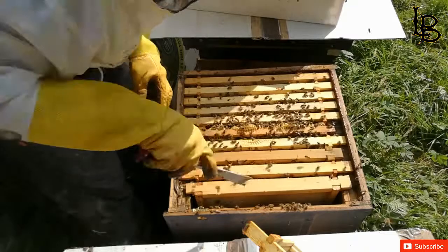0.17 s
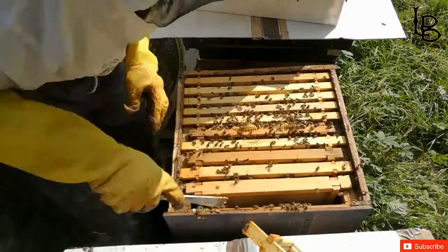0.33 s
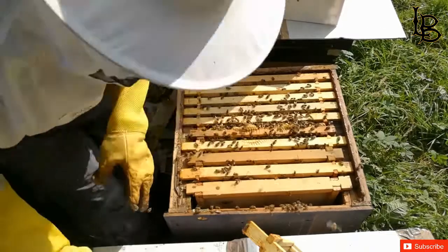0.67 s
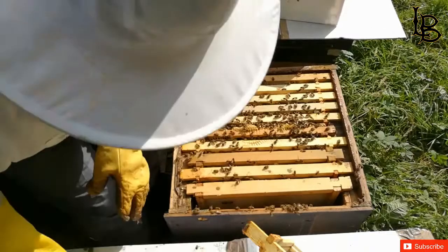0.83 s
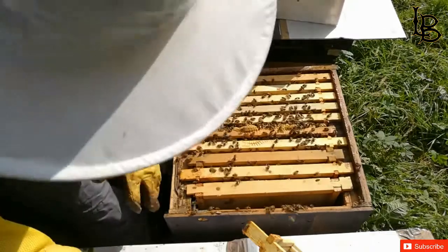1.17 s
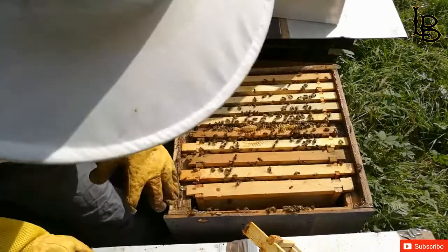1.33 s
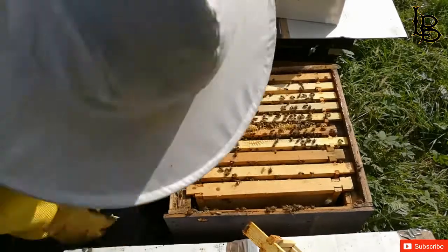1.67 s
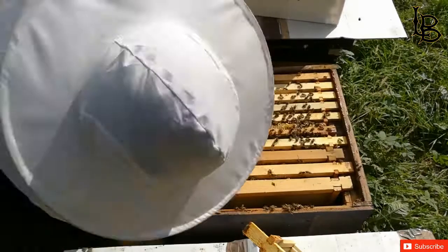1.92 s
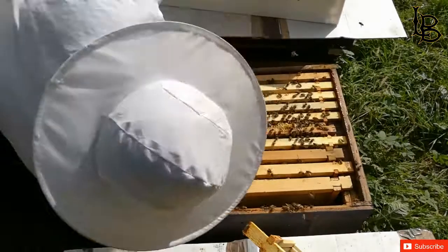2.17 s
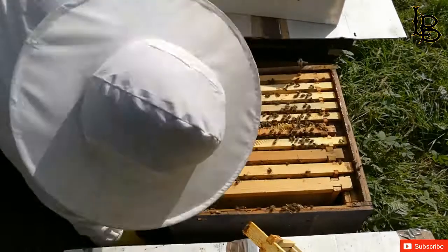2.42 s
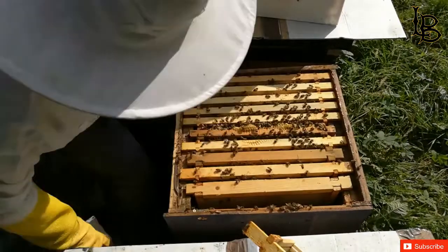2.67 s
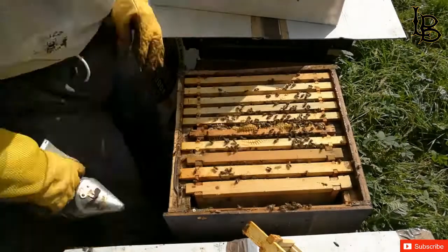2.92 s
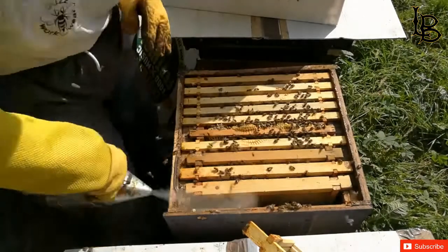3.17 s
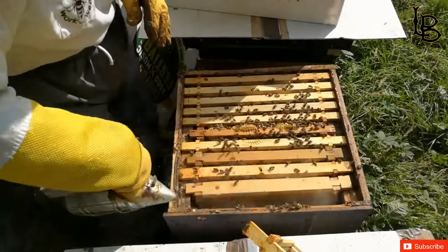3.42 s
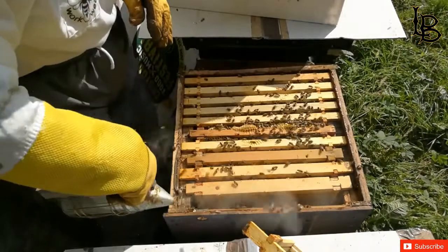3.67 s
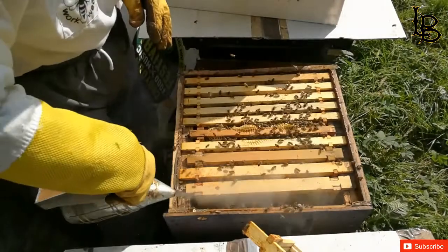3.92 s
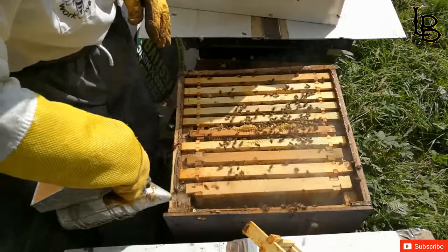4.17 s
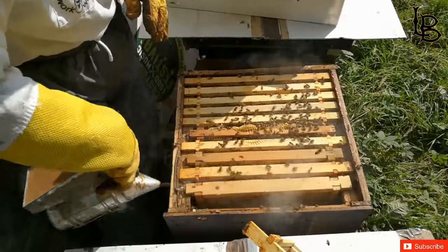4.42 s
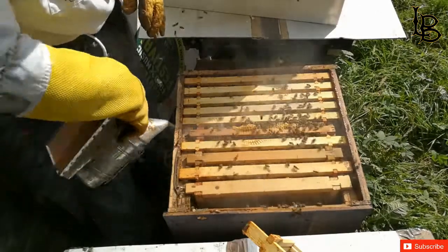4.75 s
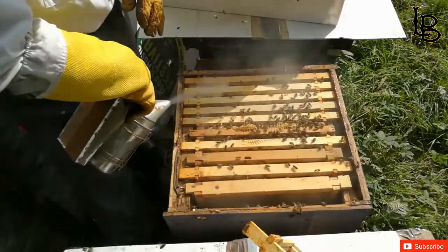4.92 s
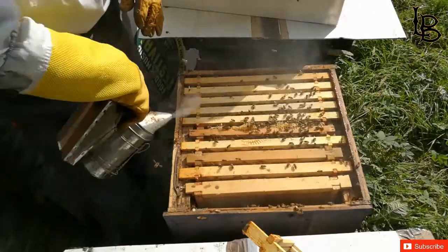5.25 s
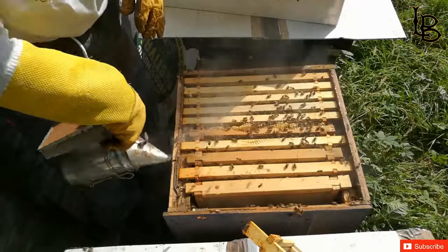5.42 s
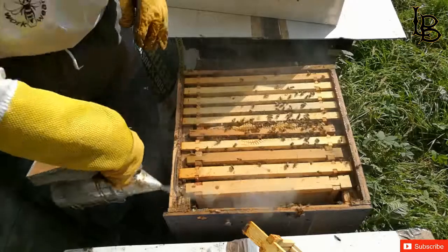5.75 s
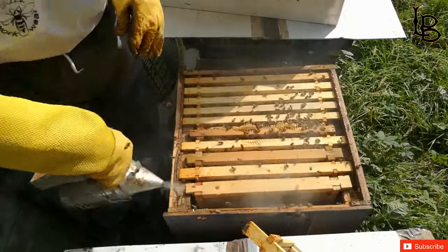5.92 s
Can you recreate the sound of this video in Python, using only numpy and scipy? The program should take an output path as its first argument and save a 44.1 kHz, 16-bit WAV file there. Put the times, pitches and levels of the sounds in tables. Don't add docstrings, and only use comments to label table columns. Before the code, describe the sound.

Outdoors by an open beehive, soft wooden knocks and a metal clatter give way to quick, hollow smoker puffs with a fine high sizzle.

```python
import sys
import numpy as np
from scipy import signal
from scipy.fft import rfft, irfft, next_fast_len
from scipy.io import wavfile
from scipy.ndimage import uniform_filter1d, map_coordinates

SR = 44100
rng = np.random.default_rng(int(sys.argv[2]) if len(sys.argv) > 2 else 0)


def amplitude_ratio(level_db):
    exponent = np.asarray(level_db, float) / 20
    return 10 ** exponent


def generate_wav(sig):
    pcm = np.round(np.clip(np.atleast_2d(sig).T, -1, 1) * 32767).astype(np.int16)
    wavfile.write(sys.argv[1], SR, pcm)


N = 268524
T = np.arange(N) / SR


def unit(x):
    return x / np.sqrt(np.mean(x ** 2) + 1e-20)


def along(points, hz):
    f, *cols = np.transpose(points)
    return [np.interp(np.log(hz + 1), np.log(f + 1), c) for c in cols]


def coloured(points):
    return lambda f: amplitude_ratio(along(points, f)[0])


def curves(rows):
    s, *cols = np.transpose(rows)
    return [np.interp(T, s, c) for c in cols]


def wobble(rate):
    knots = rng.standard_normal(int(N * rate / SR) + 4)
    return map_coordinates(knots, [T * rate])


def filtered(x, response):
    m = next_fast_len(N + 8192)
    return irfft(rfft(x, m) * response(np.fft.rfftfreq(m, 1 / SR)), m)[..., :N]


def resonant(peaks):
    def response(f):
        total = 0
        for k, (centre, width, db) in enumerate(peaks):
            peak = 1j * f * width / (centre * centre - f * f + 1j * f * width)
            total = total + (-1) ** k * amplitude_ratio(db) * peak
        return total
    return response


def noise(response, lumpy_db, rate):
    lumps = amplitude_ratio(lumpy_db * wobble(rate))
    return unit(filtered(lumps * rng.standard_normal((2, N)), response))


def add(out, s, x):
    part = out[..., round(s * SR):][..., :x.shape[-1]]
    part += x[..., :part.shape[-1]]


# frequency in Hz, lead of the left port in radians, left over right in dB, likeness (0 to 1).
LEFT_OF_CAMERA = [(60, 0.1, 2, 1), (135, 0.23, -1.5, 0.96), (238, 0.66, 0.5, 0.97), (373, 1.18, 0, 0.97),
                  (527, 1.38, 8, 0.58), (720, 2.62, 9, 0.53), (990, 2.07, 8, 0.87), (1270, 0.88, 0, .8),
                  (1385, .5, 4, 0.85), (1540, 1.2, -5, 1), (1820, 0.88, -4, 0.45), (2000, 1.9, -8.5, 0.4),
                  (2250, 3.3, -1, 0.29), (3070, 6.1, 2.5, 0.12), (8000, 4.7, 4, 0.072)]
# frequency in Hz, lead of the left port in radians, left over right in dB, likeness (0 to 1).
ALL_AROUND = [(115, -3.5, -1, 1), (200, 0.5, 0, 1), (310, 0, -2, 0.81), (478, 0.85, 3, 0.81),
              (634, 3.5, -1, 0.45), (1030, 0, 1.5, 0.45), (1380, 0, 1, 0.5), (1940, 0.5, 0, 0.093),
              (7300, -0.5, 2, 0.014), (10740, -4, 9, .02), (12460, 4, 2, .02), (15300, -0.5, -11, .02)]


def ports(a, b, table):
    m = next_fast_len(N + 8192)
    lead, pan_db, alike = along(table, np.fft.rfftfreq(m, 1 / SR))
    turn = np.arccos(np.clip(alike, -1, 1)) / 2
    mid, side = rfft(a, m) * np.cos(turn), rfft(b, m) * np.sin(turn)
    half = amplitude_ratio(pan_db / 2) * np.exp(.5j * lead)
    return irfft([(mid + side) * half, (mid - side) / half], m)[:, :N]


def ring(pitches, modes, low_db, high_db, scatter_db, clatter_db, crack_db):
    hz = np.reshape(pitches, (-1, 1))
    left_db, right_db, t60 = np.transpose(modes)[:, :, None]
    t, luck = T[:SR // 2], rng.standard_normal((len(modes), 4))
    beat_hz = 25 * amplitude_ratio(3.6 * luck[:, 2:3])
    waver = 1 + .3 * np.sin(2 * np.pi * beat_hz * t + 3 * luck[:, 3:])
    blow_db = np.where(hz < 5000, low_db, high_db) + scatter_db * luck[:, :1]
    body = amplitude_ratio(blow_db - 60 * t / t60) * (1 - np.exp(-t / 0.0022)) * waver
    left = amplitude_ratio(left_db) * body * np.sin(2 * np.pi * hz * t)
    right = amplitude_ratio(right_db) * body * np.sin(2 * np.pi * hz * t - 2 * luck[:, 1:2])
    crack = amplitude_ratio(crack_db - 60 * t / 0.013) * rng.standard_normal((2, len(t)))
    band = signal.butter(1, [600, 9000], "band", fs=SR)
    dense = signal.lfilter(*band, rng.standard_normal((2, len(t))))
    clatter = amplitude_ratio(clatter_db - 60 * t / 0.5) * dense
    return np.array([left.sum(0), right.sum(0)]) + (crack + clatter) * amplitude_ratio([[2.5], [-2.5]])


# start in seconds, low modes in dB, high modes in dB.
CHATTER_BLOWS = [
    (1.132, 4, -9),
    (1.138, 1, -3),
    (1.146, -0.5, 3.5),
    (1.151, -7, 6),
    (1.161, -10, -18),
    (1.172, -7.5, -19),
]
HELD_HZ = [770, 1144, 1515, 1620, 2406, 3346, 3542, 3758, 4662, 4972, 5712, 6398, 6697, 7942, 8013, 9534,
           10004, 11359, 11842, 13104, 13228, 14333, 15241]
# left port in dB, right port in dB, t60 in seconds.
HELD_MODES = [(-23, -33, 0.024), (-50, -45, 0.18), (-62, -48, 0.074), (-25.5, -24, 0.017),
              (-36, -40, 0.055), (-46, -60, 0.05), (-29, -36, 0.044), (-53, -57, 0.26), (-54, -56, 0.12),
              (-51.5, -55, 0.22), (-71, -75, 0.26), (-45, -47, 0.067), (-48, -63.5, 0.26),
              (-61, -41.5, 0.035), (-57, -45, 0.037), (-51, -60, 0.23), (-34.5, -54, 0.043),
              (-49.5, -38, 0.05), (-45, -49.5, 0.079), (-51.5, -47, 0.049), (-45, -45, 0.082),
              (-64, -53, 0.11), (-66, -55, 0.1)]
FREE_HZ = [786, 1148, 1624, 1864, 2373, 2420, 2729, 3479, 3550, 3749, 4663, 4969, 5250, 5713, 6391, 6690,
           8020, 8788, 9566, 10345, 11359, 13235, 14715, 14862]
# left port in dB, right port in dB, t60 in seconds.
FREE_MODES = [(-46, -65, 0.29), (-28, -33, 0.083), (-35, -58, 0.074), (-42.5, -55, 0.24), (-41, -42, 0.2),
              (-47, -57, 0.21), (-50, -51, 0.34), (-43.5, -60, 0.32), (-52, -58, 0.28), (-47, -52.5, 0.38),
              (-52, -47, 0.26), (-48, -58, 0.33), (-64, -61, 0.32), (-49, -63, 0.4), (-62, -66, 0.25),
              (-78, -59, 0.35), (-69.5, -58, 0.15), (-32, -46, 0.16), (-59, -55, 0.19), (-23, -43, 0.12),
              (-40, -51, 0.094), (-44, -60, 0.078), (-53, -58, 0.144), (-55, -63, 0.08)]


def tool():
    out = np.zeros((2, N))
    for s, low_db, high_db in CHATTER_BLOWS:
        blow = ring(HELD_HZ, HELD_MODES, low_db, high_db, scatter_db=0.0,
                    clatter_db=low_db - 53, crack_db=high_db - 48)
        add(out, s, blow)
    add(out, 1.2265, ring(FREE_HZ, FREE_MODES, 2.0, 3.1, scatter_db=2.0, clatter_db=-56, crack_db=-39))
    return filtered(out, lambda f: (f / (f + 300j)) ** 2)


# start in seconds, peak in dB, frequency in Hz, t60 in seconds, tick in dB.
WOOD_KNOCKS = [(0.318, -44.5, 86, 0.065, -62), (0.558, -48, 172, 0.15, -54.5),
               (.597, -35, 121, 0.086, -53.5), (0.599, -37, 310, 0.076, -73),
               (0.652, -37.5, 143, 0.05, -70), (.805, -46, 189, 0.064, -64),
               (0.9541, -21, 249, 0.058, -46.5), (0.991, -24.5, 263, 0.053, -54),
               (0.955, -39, 128, 0.098, -72), (1.02, -36, 232, 0.05, -63), (1.047, -42.5, 300, 0.05, -68),
               (1.062, -46, 280, .03, -70), (1.133, -30.5, 204, 0.1, -45), (1.148, -32, 202, 0.05, -39),
               (1.16, -51, 200, 0.077, -51), (1.17, -35.5, 210, 0.19, -38), (1.209, -28, 217, 0.068, -41.5),
               (1.227, -37.5, 228, 0.15, -41), (3.348, -26.5, 200, 0.049, -53),
               (3.372, -44, 310, 0.091, -64), (3.945, -68, 248, 0.046, -52),
               (6.021, -31.5, 229, 0.023, -58)]
# frequency in Hz, width in Hz, level in dB.
BOARD_PEAKS = [(180, 293, 9), (374, 142, 10.5), (697, 250, 4.5), (1190, 430, 1.5), (1835, 470, -2.5),
               (4000, 1800, -20)]
# time in seconds, peak in dB, frequency in Hz, length in seconds.
BLADE_RATTLE = [(1.141, -30.5, 680, 0.003), (1.154, -44, 485, 0.002), (1.161, -40, 910, 0.0032),
                (1.167, -37, 600, 0.0022), (1.173, -42, 800, .002), (1.213, -39, 895, 0.0023),
                (1.219, -32.5, 668, 0.0032), (1.256, -35, 720, 0.0022), (1.266, -39, 686, 0.0029),
                (1.285, -37, 680, 0.0033), (1.295, -37, 760, 0.0016), (1.305, -38, 740, 0.0023),
                (1.319, -48, 790, 0.0042), (1.357, -46, 710, 0.0068)]
# start in seconds, peak in dB, frequency in Hz, t60 in seconds.
EDGE_CLICKS = [
    (.559, -52, 1600, .03),
    (.566, -52, 1650, 0.027),
    (.572, -57, 1500, .02),
    (.5965, -38.5, 1700, 0.015),
    (.597, -50, 1050, 0.01),
    (.604, -55, 1750, .05),
    (.953, -40, 1110, 0.024),
    (.955, -70, 3650, 0.018),
    (.958, -52, 1880, .06),
    (.991, -43, 1030, 0.017),
]


def wood():
    out, ticks, t = np.zeros(N), np.zeros(N), T[:SR // 4]
    for s, db, hz, t60, tick_db in WOOD_KNOCKS:
        cycles = hz * t * (1 - 1.1 * t)
        fade = amplitude_ratio(db - 5.0 - 60 * (t / t60) ** 1.53) * (1 - np.exp(-t / 0.0011))
        add(out, s, -fade * np.sin(2 * np.pi * cycles))
        tick = amplitude_ratio(tick_db + 8.5 - 60 * t / 0.027) + amplitude_ratio(tick_db + 1.5 - 60 * t / 0.27)
        add(ticks, s, tick * rng.standard_normal(len(t)))
    for s, db, hz, length in BLADE_RATTLE:
        u = t[:SR // 16] - 1 / 32
        add(out, s - 1 / 32, amplitude_ratio(db) * np.exp(-.5 * (u / length) ** 2) * np.cos(2 * np.pi * hz * u))
    for s, db, hz, t60 in EDGE_CLICKS:
        add(out, s, amplitude_ratio(db - 60 * t / t60) * np.sin(2 * np.pi * hz * t))
    linger_db = -52 - 60 * (T / .52) ** 4 + 2 * wobble(40)
    add(out, 1.31, amplitude_ratio(linger_db) * np.sin(2 * np.pi * 732 * T + .8 * wobble(35)))
    return ports(out + filtered(ticks, resonant(BOARD_PEAKS)), np.zeros(N), LEFT_OF_CAMERA)


# full flow from in seconds, held in seconds, nozzle in dB, can over it in dB,
# chimney over it in dB.
BELLOWS_STROKES = [(3.053, 0.12, -42, 1, -3.5), (3.465, 0.037, -44.5, -2, -4.5),
                   (3.801, 0.052, -39.5, -3, -4.5), (4.182, 0.051, -41, -0.5, -4.5),
                   (4.504, 0.062, -41, -1, -11.5), (4.67, 0.016, -59.5, 2, -6),
                   (4.847, 0.049, -41.5, -1.5, -5.5), (5.233, 0.037, -43, 1, -14),
                   (5.604, 0.045, -41, -3, -7.5), (5.76, 0.013, -65.5, 5.5, -9),
                   (5.906, .04, -44, -1, -9.5)]
# squeeze in dB per second, let go in dB per second.
HAND_PACE = [(644, 598), (450, 263), (500, 446), (410, 447), (800, 350), (400, 350), (493, 397), (270, 438),
             (407, 243), (400, 350), (596, 272)]
FUEL_FLARES = [-3, 1, -1.5, 1.5, 2, 0, 1, -1, 6, 0, -6]
# time in seconds, jet swell in dB, can swell in dB, length in seconds.
GRIP_JERKS = [(3.026, 2.5, 4.5, 0.015), (3.077, -1.5, -8, 0.035), (3.147, -1, 6, 0.011),
              (3.445, -1.5, 8.5, .01), (3.49, 2.5, 4.5, 0.01), (3.771, 4, 2, .008), (3.8, -3, 0, .01),
              (3.852, -1.5, 4, 0.0092), (4.157, 4, 0, 0.0048), (4.184, 0, 8, 0.011), (4.237, 0, 0.5, .012),
              (4.259, 6, 5.5, 0.0073), (4.494, 3.5, -1, 0.0071), (4.543, 6, -0.5, 0.0056),
              (4.597, 3, 3.5, 0.01), (4.817, 5, 3, .008), (4.838, 3.5, -1.5, 0.0069),
              (4.875, 3, 4.5, 0.013), (4.893, -0.5, 2.5, 0.011), (5.203, -0.5, 4.5, .012),
              (5.239, -0.5, -10, .008), (5.27, 0, 1, 0.011), (5.616, 3, 6.5, 0.012),
              (5.662, -1.5, 6, 0.011), (5.88, -5, 8, .01), (5.915, 1.5, -2, 0.0061), (5.94, 1.5, 2, 0.015)]


def flow(voice, lead_s, lag_s, swell_db):
    out = np.full(N, -200.)
    for stroke, (squeeze, let_go), flare_db in zip(BELLOWS_STROKES, HAND_PACE, FUEL_FLARES):
        s, held, jet_db, can_db, chimney_db = stroke
        over_db = dict(nozzle=0, can=can_db, chimney=chimney_db, fuel=flare_db)[voice]
        start, end = s - lead_s, s + held + lag_s
        near = slice(round((start - .5) * SR), round((end + .5) * SR))
        early, late = np.maximum(start - T[near], 0), np.maximum(T[near] - end, 0)
        swell = swell_db * np.clip((T[near] - start) / (end - start), 0, 1)
        push = swell - let_go * late - squeeze * early
        skirt = -19.5 - 153 * (early + late)
        out[near] = np.maximum(out[near], jet_db + over_db + np.maximum(push, skirt))
    for s, jet_db, can_db, length in GRIP_JERKS:
        near = slice(round((s - .1) * SR), round((s + .1) * SR))
        jerk_db = can_db if voice == "can" else jet_db
        out[near] += jerk_db * np.exp(-((T[near] - s) / length) ** 2)
    return out


# time in seconds, glow in dB.
FUEL_GLOW = [(2.95, -79), (3.22, -79), (3.38, -67.5), (3.72, -67), (4.1, -63.5), (4.45, -60), (4.75, -60),
             (5, -57.5), (5.42, -60), (5.54, -64.5), (5.72, -60), (6.09, -61.5)]


def glow():
    return curves([(0, -120), (2.9, -120)] + list(FUEL_GLOW))[0]


# time in seconds, frequency in Hz.
NOZZLE_TILT = [(3.05, 1480), (3.2, 1450), (3.48, 1400), (3.8, 1500), (3.87, 1430), (4.2, 1450),
               (4.55, 1400), (4.84, 1290), (4.9, 1360), (5.25, 1370), (5.6, 1420), (5.68, 1460),
               (5.9, 1410), (5.98, 1480)]


def tilted(pair):
    played = np.cumsum(curves(NOZZLE_TILT)[0] / 1420) % (N - 1)
    return np.array([np.interp(played, np.arange(N), v) for v in pair])


def blown(peaks, flow_db, draught_db, tilts=True):
    answer = resonant(peaks)
    pair = noise(lambda f: answer(f) * (f / (f + 120j)) ** 2, lumpy_db=1.5, rate=63)
    if tilts:
        pair = tilted(pair)
    return unit(pair) * np.hypot(amplitude_ratio(flow_db), amplitude_ratio(glow() + draught_db))


# frequency in Hz, width in Hz, level in dB.
CAN_PEAKS = [(228, 79.3, 6), (385.5, 151, -4)]
# frequency in Hz, width in Hz, level in dB.
CHIMNEY_PEAKS = [(618, 370, -13), (865, 177, 3.5)]
# frequency in Hz, width in Hz, level in dB.
NOZZLE_PEAKS = [(1386, 145, 7), (1710, 378, 0), (1970, 284, -2.5), (2580, 330, -15), (2880, 460, -16.5)]


def smoker():
    can_db = flow("can", lead_s=0.0084, lag_s=0.012, swell_db=1.5)
    chimney_db = flow("chimney", lead_s=0, lag_s=0, swell_db=0.0)
    nozzle_db = flow("nozzle", lead_s=0, lag_s=0, swell_db=-1)
    out = blown(CAN_PEAKS, can_db, draught_db=-33, tilts=False)
    out = out + blown(CHIMNEY_PEAKS, chimney_db, draught_db=-10)
    out = out + blown(NOZZLE_PEAKS, nozzle_db, draught_db=-9)
    return ports(*out, LEFT_OF_CAMERA)


# frequency in Hz, level in dB per Hz.
SIZZLE_COLOUR = [(1290, -10), (2200, -7), (3380, -1), (4280, -1.5), (5200, -2.5), (6400, -7.5),
                 (8050, -1.5), (9000, -1.5), (11700, -39), (19800, -120)]
# frequency in Hz, level in dB per Hz.
FIZZ_COLOUR = [(8000, -18), (9300, -3), (10600, 0), (12000, -3.5), (13500, -14)]
# frequency in Hz, level in dB per Hz.
TOP_COLOUR = [(10000, -22), (12300, -10), (13500, -5.5), (15000, -3.5)]
# time in seconds, frequency in Hz.
SIZZLE_HOLLOW = [
    (3.3, 4750),
    (3.9, 4000),
    (4.07, 4550),
    (4.4, 4300),
    (4.76, 4070),
    (4.84, 3700),
    (4.95, 4270),
    (5.55, 4350),
    (6.09, 3860),
]


def embers():
    lag_s, blur_s = 0.0083, .035
    flare_db = uniform_filter1d(flow("fuel", lead_s=-lag_s, lag_s=lag_s, swell_db=0), round(blur_s * SR))

    def level(glow_mix_db, under_jet_db):
        return np.hypot(amplitude_ratio(glow() + glow_mix_db), amplitude_ratio(flare_db + under_jet_db))

    direct = noise(coloured(SIZZLE_COLOUR), lumpy_db=0.5, rate=220)
    delay_s = 1 / curves(SIZZLE_HOLLOW)[0]
    echo = np.array([np.interp(T - delay_s, T, v) for v in direct])
    sizzle = level(-0.5, -21) * amplitude_ratio(1.5) * unit(direct - .6 * echo)
    fizz = level(-1, -21) * amplitude_ratio(1.0) * noise(coloured(FIZZ_COLOUR), lumpy_db=1.5, rate=63)
    top = level(-1.5, -30) * amplitude_ratio(5.0) * noise(coloured(TOP_COLOUR), lumpy_db=0.5, rate=200)
    return ports(*(sizzle + fizz + top), ALL_AROUND)


def leak():
    flutter_hz = 170 * (1 + 0.168 * wobble(35))
    flap = 1 + 0.83 * np.sin(2 * np.pi * np.cumsum(flutter_hz) / SR)
    seam = resonant([(10750, 2300, 0)])
    hiss = unit(filtered(flap * rng.standard_normal((2, N)), lambda f: seam(f) ** 2))
    opening = np.interp(T, (3.3, 3.32, 3.38, 3.41, 3.7), [0.0029, 0.23, 0.76, 0.38, 0.029])
    return ports(*(amplitude_ratio(-51 + 1.6 * wobble(34)) * opening * hiss), ALL_AROUND)


# time in seconds, wingbeat in Hz, level in dB.
NEAR_BEES = [(0, 185, -70), (1.9, 175, -80), (2.15, 175, -66), (2.5, 178, -71.5), (3, 190, -69),
             (3.7, 190, -64), (4.3, 195, -61.5), (4.7, 200, -60.5), (5.1, 195, -56), (5.45, 215, -59),
             (5.75, 230, -66), (6.09, 200, -66)]
# multiple of the wingbeat, level in dB.
WING_HARMONICS = [(1, -35), (2, 3.5), (3, -18), (5, -8), (6, -4), (7, -10), (8, -2)]


def bees(count=4):
    beat_hz, db = curves(NEAR_BEES)
    out = np.zeros((2, N))
    for k in range(count):
        unsteady_hz = beat_hz * (1 + .08 * wobble(3) + .06 * wobble(45))
        turn = 2 * np.pi * np.cumsum(unsteady_hz) / SR
        buzz = sum(amplitude_ratio(level) * np.sin(m * turn) for m, level in WING_HARMONICS)
        out[k % 2] += amplitude_ratio(1.64 * wobble(6.3)) * buzz
    # Hz, radians left leads, left-right dB, likeness
    near_camera = [(100, 0, -1, 0.71), (400, 0.021, -1.2, 0.61), (1400, 0, -1.1, 0.89)]
    return ports(*(amplitude_ratio(db) * unit(out)), near_camera)


# frequency in Hz, level in dB per Hz.
AIR_COLOUR = [(12, -29), (20, 2.5), (90, -7.5), (125, -11.5), (260, -9), (294, -20.5), (339, -13),
              (407, -13), (480, -14.5), (848, -17), (1410, -17.5), (2600, -26), (3380, -60), (5720, -120)]
# time in seconds, level in dB.
GUSTS = [
    (0, -68),
    (.5, -67.5),
    (.8, -63.5),
    (1.0, -65),
    (1.34, -60.5),
    (1.6, -68),
    (3, -68.5),
    (4.87, -65.5),
    (5.1, -67),
    (6.09, -64),
]
# frequency in Hz, lead of the left port in radians, left over right in dB, likeness (0 to 1).
BREEZE_AT_PORTS = [(30, 0, 0, .999), (70, 0, 0, .995), (120, 0, 0, .97)]
# frequency in Hz, level in dB per Hz.
HISS_COLOUR = [(1530, -31), (2600, -1.5), (3000, -1.5), (5960, -9), (8280, -10), (10800, -6), (12700, -8.5),
               (15500, -8.5)]
# time in seconds, level in dB, length in seconds.
CLOTH_RUSTLE = [
    (0.65, -75, 0.013),
    (0.877, -76.5, 0.054),
    (2.16, -81, 0.036),
    (2.3, -80.5, .04),
    (2.75, -80, 0.1),
    (2.928, -88, 0.017),
    (1.4, -84, .006),
]


def air():
    gust_db, = curves(GUSTS)
    meadow_db = -64.5 + 0.47 * (gust_db - gust_db.mean())
    rustle = sum(amplitude_ratio(2 * db) * np.exp(-((T - s) / length) ** 2) for s, db, length in CLOTH_RUSTLE)

    def band(colour, lo_hz, hi_hz):
        return lambda f: coloured(colour)(f) * (f >= lo_hz) * (f < hi_hz)

    breeze = amplitude_ratio(gust_db + 4.5) * noise(band(AIR_COLOUR, 0, 130), lumpy_db=0.0, rate=7.57)
    meadow = amplitude_ratio(meadow_db + 3.5) * noise(band(AIR_COLOUR, 110, 2600), lumpy_db=1.1, rate=8.7)
    hiss_level = amplitude_ratio(10) * np.sqrt(amplitude_ratio(2 * -78) + rustle)
    hiss = hiss_level * noise(band(HISS_COLOUR, 2600, np.inf), lumpy_db=-0.5, rate=23)
    return ports(*breeze, BREEZE_AT_PORTS) + ports(*(meadow + hiss), ALL_AROUND)


def scene():
    return tool() + wood() + smoker() + embers() + leak() + bees() + air()


def roll_off(x):
    return signal.sosfilt(signal.butter(12, 15550, fs=SR, output="sos"), x)


def record(dry):
    mix = filtered(dry, lambda f: 1 / (1 + (f / 15650) ** 120))
    return roll_off(mix)


dry = scene()
out = record(dry)
generate_wav(out)
```